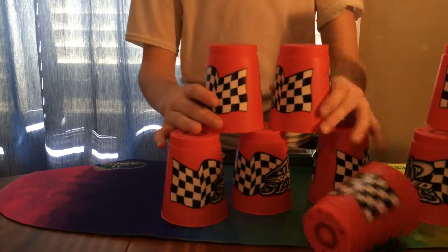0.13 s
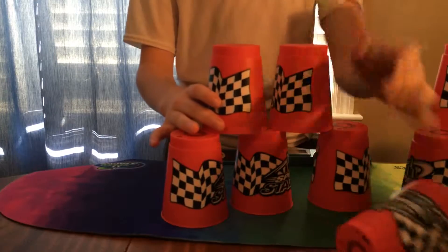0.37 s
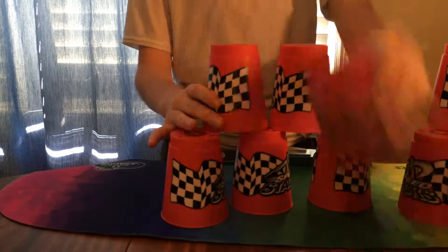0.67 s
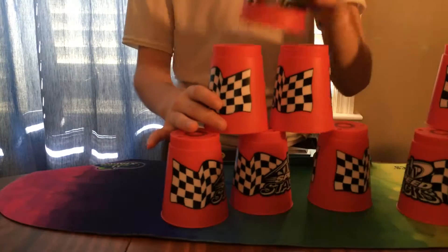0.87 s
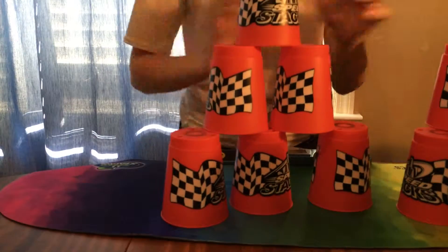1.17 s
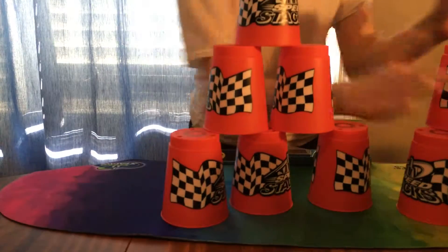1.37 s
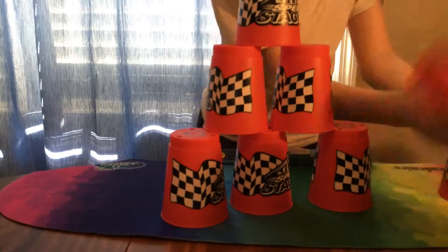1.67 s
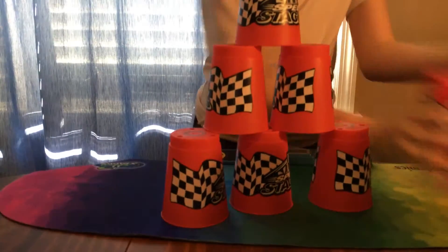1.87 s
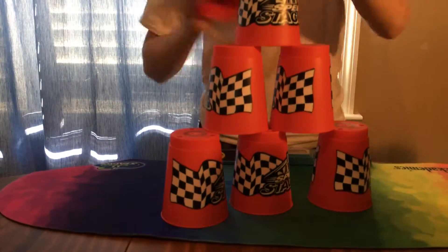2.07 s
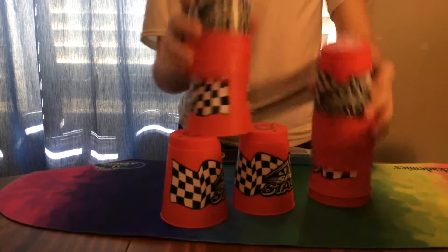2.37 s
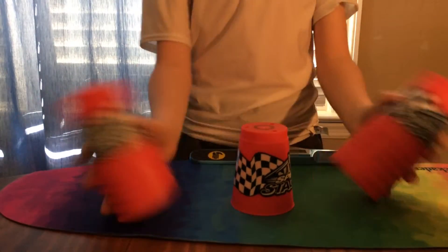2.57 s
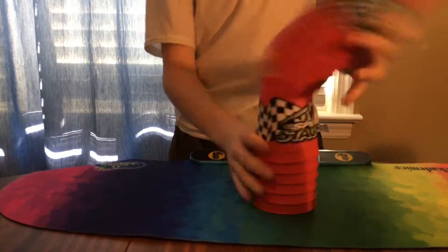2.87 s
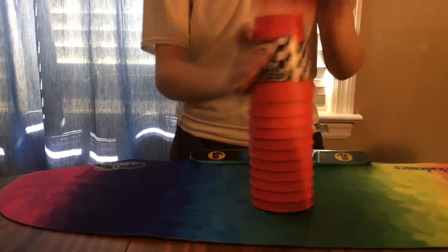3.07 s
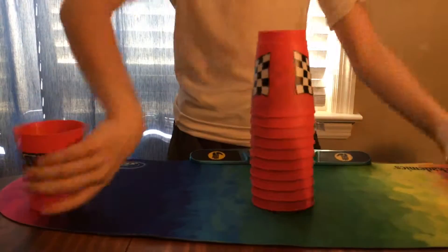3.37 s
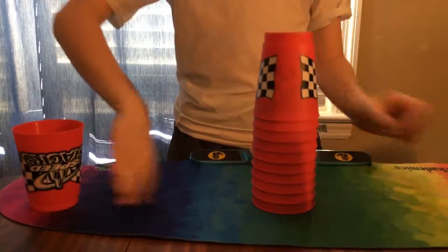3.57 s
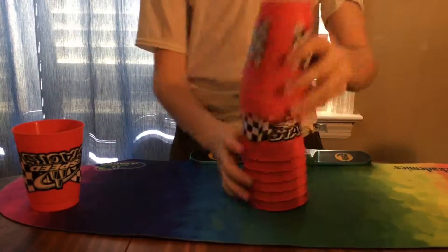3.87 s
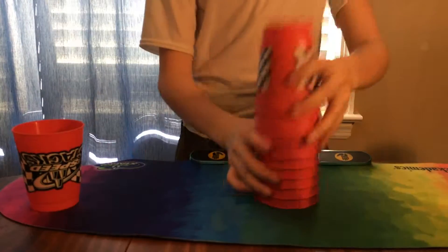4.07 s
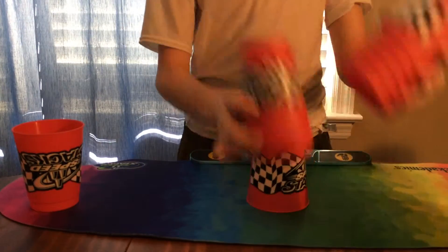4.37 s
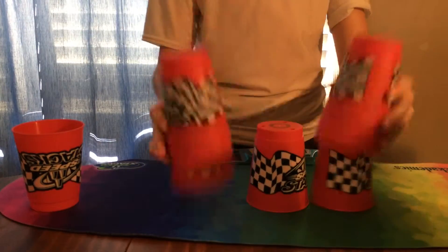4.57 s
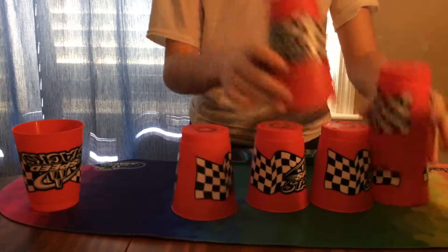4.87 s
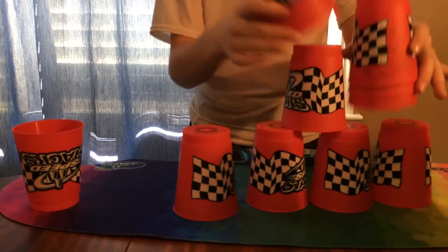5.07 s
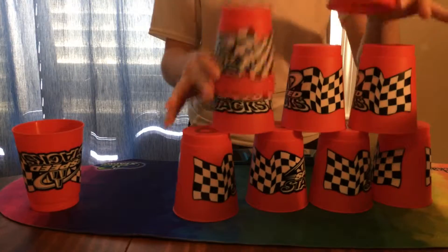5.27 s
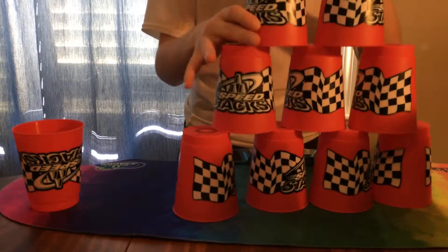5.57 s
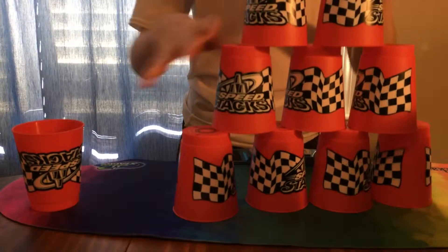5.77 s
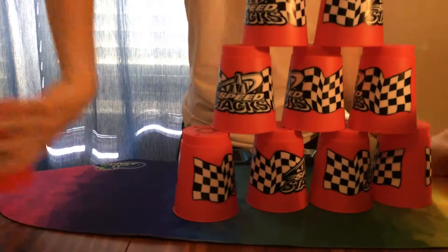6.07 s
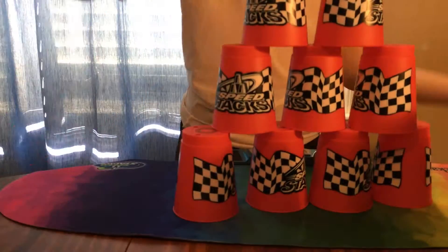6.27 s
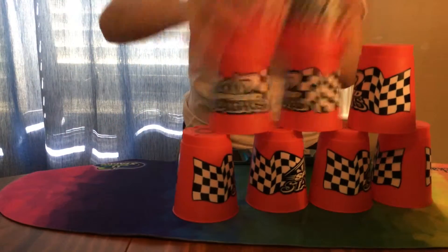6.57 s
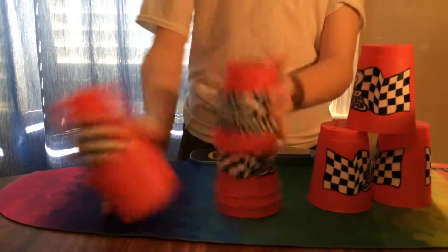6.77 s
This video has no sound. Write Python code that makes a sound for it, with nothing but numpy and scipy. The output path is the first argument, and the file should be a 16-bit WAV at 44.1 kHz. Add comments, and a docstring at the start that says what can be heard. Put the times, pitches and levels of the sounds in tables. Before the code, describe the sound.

Plastic cups clack and rasp in fast runs as they are stacked and unstacked on a mat in a small room.

```python
"""Plastic cups are stacked and unstacked fast on a thin mat over a wooden table in a small room.
First come a few clacks and a fallen cup rolls; each impact puffs the air in a cup, rings its wall, cracks
at the rim and thumps the table or the cups below. From 1.5 s to 3.1 s three towers collapse: sliding
friction rasps and makes the air columns hum. Scattered clacks and strokes follow, and at 6.6 s a last
tower slides together."""
import sys
import numpy as np
from scipy import signal
from scipy.fft import rfft, irfft, next_fast_len
from scipy.io import wavfile
from scipy.ndimage import uniform_filter1d, map_coordinates

SR = 44100
rng = np.random.default_rng(int(sys.argv[2]) if len(sys.argv) > 2 else 0)


def inscribe(sig):
    """Save sig as 16-bit PCM at rate SR to the path in sys.argv[1].

    A 1-D sig is mono; a 2-D sig holds one channel per row.
    Samples are clipped to [-1, 1] before scaling.
    """
    pcm = np.round(np.clip(np.atleast_2d(sig).T, -1, 1) * 32767)
    wavfile.write(sys.argv[1], SR, pcm.astype(np.int16))


N = 305169


def amp(db):
    """Amplitude ratio of a level in dB."""
    return 10 ** (np.asarray(db) / 20)


def unit(x):
    """Normalisation to rms 1."""
    return x / np.sqrt(np.mean(x ** 2) + 1e-20)


def along(points, hz):
    """Interpolation on a logarithmic frequency axis."""
    f, v = np.transpose(points)
    return np.interp(np.log(hz + 1), np.log(f + 1), v)


def filtered(x, response):
    """Linear filtering: the spectrum times a frequency response."""
    m = next_fast_len(N + SR // 2)
    return irfft(rfft(x, m) * response(np.fft.rfftfreq(m, 1 / SR)), m)[..., :N]


def coloured(x, spectrum):
    """Spectral shaping by relative levels, at rms 1."""
    return unit(filtered(x, lambda hz: amp(along(spectrum, hz))))


def ring(t, hz, db, t60, rise):
    """Modal superposition: damped sines that build up over the contact time."""
    hz, db, t60 = (np.reshape(v, (-1, 1)) for v in (hz, db, t60))
    return np.sum(amp(db - 60 * t / t60) * np.sin(2 * np.pi * hz * t), 0) * (1 - np.exp(-t / rise))


def struck(modes, t, chance, rise, spread_db, detune):
    """Impact excitation of modes, with scatter in pitch and strength."""
    hz, db, t60 = np.transpose(modes)
    n = len(hz)
    return ring(t, hz * (1 + detune * chance[:n]), db + spread_db * chance[-n:], t60, rise)


def grit(per_s, spread_db):
    """Amplitude modulation breaks noise into grains of uneven size."""
    sizes = amp(spread_db * rng.standard_normal(int(N * per_s / SR) + 2))
    return rng.standard_normal(N) * np.interp(np.arange(N) * per_s / SR, np.arange(len(sizes)), sizes)


def patchy(x, depth_db):
    """Spectral modulation: the colour shifts from moment to moment."""
    z = signal.stft(x, nperseg=256)[2]
    field = uniform_filter1d(rng.standard_normal(z.shape), size=5, axis=0)
    field = uniform_filter1d(field, size=6, axis=1)
    return signal.istft(z * amp(depth_db * unit(field)), nperseg=256)[1][:N]


def wander(step):
    """Smooth random modulation, a new value every step samples."""
    return map_coordinates(rng.standard_normal(N // step + 2), [np.arange(N) / step])


# Noise floor spectrum: f/Hz, level/dB
HUSH = [(15, -35.5), (25, 2.5), (87, 3), (212, -13), (249, -6), (335, -4), (575, -15.5), (840, -8),
        (1130, -18.5), (1290, -10), (1790, -23.5), (8830, -37.5), (16000, -38.5)]
def hush():
    """Stationary noise of room and microphone."""
    return amp(-63.5) * coloured(rng.standard_normal(N), HUSH)


# Background envelope: t/s, hiss level/dB, rumble level/dB
BACKGROUND = [(0, -65, -48), (0.599, -87, -63.5), (0.799, -77, -65.5), (1.5, -95, -67.5), (1.7, -60, -39.5),
              (2.05, -69, -66), (2.6, -74, -50), (3.3, -65.5, -68.5), (3.549, -63, -46.5),
              (3.715, -62, -64.5), (3.86, -70, -58.5), (4.2, -70, -59), (4.901, -63.5, -59),
              (5.8, -73.5, -64), (6.2, -66.5, -62), (6.5, -90, -75), (6.6, -69.5, -57), (6.9, -59, -43)]
# Spectrum of the hiss and of a bright rim crack: f/Hz, level/dB
BRIGHT = [(1500, -3), (2500, 3.5), (4000, 1.5), (7000, 2.5), (10000, -1.5), (15000, -13)]
# Rumble spectrum: f/Hz, level/dB
RUMBLE = [(25, -10), (60, 10), (150, 3.5), (300, 3), (450, -33)]
def background():
    """Modulated noise: the hiss and low rumble rise and fall, dropping lowest in the long pauses."""
    s, hiss_db, rumble_db = np.transpose(BACKGROUND)
    time = np.arange(N) / SR
    hiss = coloured(patchy(grit(30, spread_db=2), depth_db=3), BRIGHT)
    rumble = coloured(grit(25, spread_db=3), RUMBLE)
    return amp(np.interp(time, s, hiss_db)) * hiss + amp(np.interp(time, s, rumble_db)) * rumble


# Reverberation time: f/Hz, T60/s
ROOM = [(100, 0.46), (400, 0.17), (1000, 0.22), (4000, 0.21), (12000, 0.072)]
def room(x):
    """Reverberation: each band decays at its own rate, with a fresh tail for each stretch of sound."""
    out, step, delay = np.zeros(N + SR), SR // 8, SR // 200
    for k in range(0, N, step):
        hz, t, z = signal.stft(rng.standard_normal(SR // 2), SR, nperseg=256)
        tail = signal.istft(z * amp(-60 * t / along(ROOM, hz)[:, None]), SR, nperseg=256)[1]
        wet = signal.fftconvolve(x[k:k + step], tail / np.linalg.norm(tail))
        out[k + delay:][:len(wet)] += wet
    return out[:N]


# Modes of the table: f/Hz, level/dB, T60/s
TABLE_MODES = [(84.7, -14, 0.17), (121.3, -15.5, 0.17), (158.1, -7, 0.11), (212.5, -7, 0.079),
               (279, -2, 0.06), (329.5, -3, 0.06), (417, -18.5, 0.13)]
# Soft knocks of a hand or cushioned cup: t/s, relative level/dB
BUMPS = [(3.581, -44), (3.696, -34.5), (3.728, -41), (3.895, -40), (4.07, -31), (6.147, -42),
         (6.213, -49.5)]
def bumps():
    """A long contact acts as a low-pass: only low table modes ring, damped by the hand."""
    out, t = np.zeros(N + SR), np.arange(SR // 4) / SR
    cutoff_hz, t60_share = 141, 0.63
    low = [(hz, db - 20 * np.log10(1 + (hz / cutoff_hz) ** 6), t60_share * t60)
           for hz, db, t60 in TABLE_MODES]
    for (s, db), chance in zip(BUMPS, rng.standard_normal((len(BUMPS), 16))):
        knock = struck(low, t, chance, rise=0.0034, spread_db=3, detune=0.023)
        out[round(s * SR):][:len(t)] += amp(db + 15) * knock
    return out[:N]


# Rubs on a cup wall: t/s, duration/s, f/Hz, level/dB
SQUEAKS = [(1.69, 0.011, 1750, -26.5), (1.729, 0.03, 1870, -36.5), (4.002, 0.028, 700, -39.5),
           (4.064, 0.031, 750, -40), (4.094, 0.018, 5840, -42.5), (4.138, 0.013, 3250, -41),
           (4.287, 0.025, 4300, -43.5), (1.785, 0.02, 3300, -25), (6.584, 0.021, 2220, -24.5),
           (6.701, 0.012, 2130, -27), (6.757, 0.02, 3290, -26.5)]
def squeaks():
    """Resonance: one narrow wall mode filters friction noise."""
    out = np.zeros(N)
    for start, length, hz, db in SQUEAKS:
        n = round(length * SR)
        b, a = signal.iirpeak(hz, Q=hz / 130, fs=SR)
        tone = unit(signal.lfilter(b, a, rng.standard_normal(n)))
        out[round(start * SR):][:n] += amp(db) * tone * np.hanning(n) ** 0.29
    return out


# Spectra of sliding plastic and of its finest grain: f/Hz, level/dB
RASP = [(650, -31), (1100, -19.5), (1450, -13.5), (2350, -13), (3050, -12), (3400, -6.5), (4070, -9),
        (4920, -12.5), (5430, -6.5), (9500, -12.5), (12400, -61.5)]
SIZZLE = [(7500, -13.5), (9000, -3), (11500, 0.5), (14000, -3), (16000, -2)]
# Rims catching: t/s, initial level/dB
TICKS = [(1.6361, -19.5), (2.3261, -24), (2.394, -33), (2.4543, -33), (2.5735, -23), (2.6247, -28),
         (2.904, -26.5), (4.14, -30.5), (4.2637, -41), (4.494, -34.5), (4.7417, -23), (6.575, -23),
         (6.7536, -23), (6.796, -27), (6.8543, -27)]
def ticks():
    """Transients: one rim catches another in a fast-decaying burst of friction noise."""
    out, t, t60 = np.zeros(N + SR), np.arange(SR // 50) / SR, 0.0075
    noise = rng.standard_normal(N)
    fine = unit(coloured(noise, SIZZLE) + coloured(noise, RASP))
    for s, db in TICKS:
        k = round(s * SR)
        out[k:k + len(t)] += amp(db - 60 * t / t60) * fine[k:k + len(t)]
    return out[:N]


# Air columns of sliding cups: f/Hz, bandwidth/Hz, level/dB
HOLLOW = [(636.7, 129, 2.5), (657, 255, 2), (802, 188, -2), (882, 87, -7.5)]
def hollow(f):
    """Frequency response of parallel air resonances, alternating in sign."""
    return sum((-1) ** k * amp(db) * 1j * f * width / (hz * hz - f * f + 1j * f * width)
               for k, (hz, width, db) in enumerate(HOLLOW))


# A rolling cup, and one curve per collapsing tower: t/s, rasp/dB, sizzle re rasp/dB, hum/dB
ROLL = [(.282, -64, -13, -63), (.34, -79, -7, -57), (.42, -78, -11, -52.5), (.53, -71, -4, -53),
        (.598, -70, -6.5, -60), (.69, -90, -12.5, -48.5), (.754, -89, -11, -69)]
COLLAPSES = [
    [(1.536, -53.5, -24, -43), (1.558, -27.5, -18.5, -27), (1.602, -32.5, -14, -40.5),
     (1.61, -38, -12, -31.5), (1.655, -35.5, -4, -41), (1.705, -51, 0, -44), (1.714, -45, -7.5, -47.5),
     (1.77, -50, -5.5, -50.5), (1.808, -34.5, -20, -25.5), (1.835, -59.5, -14.5, -53.5),
     (1.868, -44.5, -5, -29.5), (1.9, -44.5, -12, -46), (1.965, -55.5, -13.5, -56.5)],
    [(2.222, -43, 9, -47.5), (2.245, -36, -3.5, -29.5), (2.277, -30.5, -0.5, -15.5),
     (2.287, -40.5, -10.5, -20.5), (2.32, -39, -11, -35), (2.33, -28, -6, -23), (2.372, -50, -14, -35),
     (2.43, -44, -1.5, -34), (2.445, -51, -3.5, -39), (2.54, -44, -9, -39.5), (2.55, -39.5, -5.5, -21.5),
     (2.615, -43, -0.5, -50), (2.67, -44.5, -8, -40), (2.682, -51.5, -3, -30.5), (2.728, -49, -12, -32)],
    [(2.921, -43.5, 4, -39), (2.949, -26.5, -2, -17.5), (2.96, -49, -15, -20), (3.005, -48.5, -5, -30.5),
     (3.07, -48.5, 8.5, -63), (3.08, -48.5, 1, -31), (3.121, -78, -12.5, -49)],
    [(6.574, -51, -5, -33), (6.595, -34, -2, -49), (6.608, -45, 2, -11.5), (6.66, -34.5, -2, -62),
     (6.684, -42, -9, -21.5), (6.7, -34, -1, -32), (6.735, -31, -5, -42), (6.755, -37, -10, -51),
     (6.805, -41, -2, -51), (6.85, -44.5, -5, -57), (6.862, -39, -3, -30), (6.92, -43.5, -14, -38)],
]
# Strokes of cups and fingers: peak t/s, swell/s, fade/s, rasp/dB, sizzle re rasp/dB, hum/dB
STROKES = [(0.066, 0.013, 0.021, -49.5, -28, -61), (.603, 0.0036, 0.075, -43, -20.5, -46.5),
           (.645, 0.053, 0.023, -45, -1.5, -51), (0.891, .01, 0.021, -68.5, -2, -88),
           (1.024, 0.087, 0.019, -90, -4.5, -52), (1.115, 0.005, 0.063, -64, -15, -45.5),
           (2.136, 0.017, 0.24, -63, -12, -60.5), (2.79, 0.0057, 0.046, -56.5, -12.5, -57),
           (3.16, 0.058, 0.037, -44.5, -1.5, -58), (3.201, 0.0052, 0.047, -37, -2.5, -43),
           (3.9, 0.062, 0.046, -55.5, -4, -58), (3.995, 0.076, 0.02, -44, -2.5, -45.5),
           (4.119, 0.059, 0.015, -43, -8, -53), (4.15, 0.015, 0.0093, -45, 3.5, -65),
           (4.165, 0.013, 0.064, -35, -1.5, -48), (4.299, 0.061, 0.06, -38, -8.5, -64),
           (4.34, 0.006, 0.27, -63, -4, -55), (4.495, 0.0029, 0.016, -42.5, -2, -65),
           (4.615, 0.073, 0.082, -42, -5, -49), (4.731, 0.037, 0.079, -46, -6, -48),
           (4.799, 0.0039, 0.0059, -40.5, 0, -60), (4.952, 0.0046, 0.081, -39.5, -6, -29),
           (5.248, 0.02, 0.43, -55.5, -24, -43.5), (5.484, 0.0039, 0.017, -44, -15, -58),
           (6.107, 0.0049, 0.053, -50.5, -3.5, -62), (6.196, 0.0095, 0.054, -61, -14, -60),
           (6.265, 0.019, 0.045, -56.5, -18.5, -66), (6.38, 0.031, 0.027, -62, -18, -87.5)]
def slides():
    """Stick-slip friction rasps, sizzles and drives the air columns into a hum."""
    time, gains = np.arange(N) / SR, np.zeros((3, N))
    swell_db, fade_db, hum_share = 19, 20.5, 0.8
    strokes = [[(s + lag, rasp_db - loss_db, sizzle_db, hum_db - hum_share * loss_db)
                for lag, loss_db in ((-swell, swell_db), (0, 0), (fade, fade_db))]
               for s, swell, fade, rasp_db, sizzle_db, hum_db in STROKES]
    for curve in [ROLL, *COLLAPSES, *strokes]:
        s, rasp_db, sizzle_db, hum_db = np.transpose(curve)
        span = slice(round(s[0] * SR), round(s[-1] * SR))
        levels = rasp_db, rasp_db + sizzle_db, hum_db
        gains[:, span] += amp([np.interp(time[span], s, db) for db in levels])
    gains = uniform_filter1d(gains, size=260, axis=1)
    ridges = 4 * (rng.random(N) < 200 / SR) * rng.standard_normal(N)  # about 200 rim catches a second
    grains = unit(grit(470, spread_db=3.5)) + signal.lfilter([1], [1, -.6], ridges)
    grains = patchy(grains, depth_db=4.5)  # the rubbing spot moves
    hum = unit(filtered(grit(120, spread_db=4), hollow))
    return np.sum(gains * [coloured(grains, RASP), coloured(grains, SIZZLE), hum], 0)


# Modes of the cups below: f/Hz, level/dB, T60/s
PYRAMID_MODES = [(80, -15, .15), (145, -7.5, 0.11), (327, -3, 0.083), (392.3, 1, 0.069)]
# Spans in which cups land on cups: start t/s, end t/s
ON_CUPS = [(.2, .22), (1, 1.05), (5, 5.8)]
def thump(s, t, chance):
    """Free vibration of the struck support: lower cups or table."""
    modes = PYRAMID_MODES if any(start < s < end for start, end in ON_CUPS) else TABLE_MODES
    return struck(modes, t, chance, rise=0.0021, spread_db=2.8, detune=0.051)


# Cup wall modes: f/Hz, level/dB, T60/s
WALL_MODES = [(1091, -8, 0.043), (1271, 1.5, 0.02), (1563, -0.5, 0.016), (2016, -0.5, 0.012)]
def wall(t, chance, rocking, rattle):
    """Damped vibration of the wall, with the rattle of loose cups."""
    modes = struck(WALL_MODES, t, chance, rise=0.0009, spread_db=3.5, detune=0.055)
    return modes * np.sqrt(rocking) + rattle * amp(-9.5 - 60 * t / 0.096) * (1 - np.exp(-t / 0.00037))


# Rim modes: f/Hz, level/dB, T60/s
RIM_MODES = [(3240, -13.5, 0.014), (4005, -11, 0.014), (5380, -15.5, 0.012), (5760, -11.5, 0.0045),
             (6580, -13, 0.014)]
def rim(t, chance, snap, chatter):
    """A brief impact is broadband: a noise burst over modes blurred by chatter."""
    burst = snap * (amp(1.0 - 60 * t / 0.0052) + amp(-21.5 - 60 * t / 0.09)) * (1 - np.exp(-t / 0.0012))
    return burst + struck(RIM_MODES, t, chance, rise=0.00011, spread_db=3.0, detune=0.034) * chatter


# Air columns of cups standing nearby: f/Hz, level/dB, T60/s
NEIGHBOURS = [(421.8, -10.5, 0.064), (617, -4, 0.044), (647.3, -8.5, 0.056), (750.4, -18, 0.077),
              (834.5, -14.5, 0.15), (876.4, -12.5, 0.085), (931, -7.5, 0.06)]
def air_column(t, hz, chance, rocking):
    """Squeezed air puffs and rings on; cups close in pitch answer most, by sympathetic resonance."""
    near_hz, near_db, t60 = np.transpose(NEIGHBOURS)
    n, swell = len(near_hz), t / 0.00085
    puff = 1.45 * swell ** 2 * np.exp(-swell) * np.sin(2 * np.pi * hz * t)
    level_db = near_db - 10 * np.log10(1 + ((near_hz - hz) / 300) ** 2) + 4.5 * chance[-n:]
    answer = ring(t, near_hz * (1 + 0.012 * chance[:n]), level_db, t60, rise=0.0032)
    own = ring(t, hz, db=-0.41, t60=0.087, rise=0.0014)
    return puff + amp(-8.5) * (2.37 * np.sign(chance[0]) * answer + own) * rocking


# Spectra of a cushioned crack and of loose cups shaking: f/Hz, level/dB
DULL = [(1500, -12), (2500, -2), (4000, 5), (6500, -5), (10000, -23.5), (15000, -31.5)]
RATTLE = [(200, -21), (350, 8), (700, -8.5), (1200, 1.5), (2000, 0), (2700, -19), (4000, -43)]
# Impacts: t/s, air level/dB, air f/Hz, thump level/dB, wall level/dB, rim level/dB
CONTACTS = [(0.0395, -15.5, 295, -34, -38.5, -37.5), (0.0967, -22, 283, -32.5, -58, -47),
            (0.1498, -31.5, 614, -30, -46, -55), (0.2123, -3, 826, -20.5, -17, -11.5),
            (0.3158, -27.5, 877, -32, -33.5, -43.5), (0.4949, -35.5, 644, -39.5, -69, -66),
            (0.5998, -28, 227, -33.5, -43.5, -41), (0.655, -35, 220, -35, -69, -60),
            (.746, -43, 692, -57, -75.5, -71), (.989, -42, 750, -49, -66.5, -71.5),
            (1.028, -6.5, 825, -25, -14.5, -14.5), (1.0427, -9.5, 860, -24, -44.5, -24.5),
            (1.135, -29, 820, -37, -71, -53), (1.5626, -15.5, 806, -23.5, -34, -34.5),
            (1.581, -18, 927, -26.5, -38.5, -35.5), (1.5892, -11.5, 880, -27.5, -42, -24),
            (1.6119, -15, 497, -39.5, -25.5, -18), (1.6405, -15.5, 876, -20, -29.5, -20.5),
            (1.6594, -38.5, 467, -30, -28.5, -19), (1.6766, -21, 895, -33, -18, -15.5),
            (1.7116, -29.5, 925, -37.5, -15, -33.5), (1.722, -22, 844, -39.5, -21, -13),
            (1.7873, -13, 920, -12, -8.5, -7.5), (1.855, -5.5, 880, -18.5, -14, -14),
            (1.873, -35.5, 808, -26.5, -37, -13.5), (1.9088, -26, 530, -30.5, -26, -23.5),
            (1.9245, -22, 1140, -15, -10.5, -13), (2.223, -19.5, 740, -27, -47, -17),
            (2.2439, -9.5, 850, -25, -32, -25), (2.2728, -17, 860, -12, -37, -28.5),
            (2.2793, -7, 718, -21.5, -12.5, -12), (2.324, -17, 880, -20, -29, -18),
            (2.3398, -5, 803, -20.5, -21, -17), (2.361, -26.5, 845, -40.5, -22, -20),
            (2.395, -29.5, 624, -51.5, -43.5, -30), (2.407, -21.5, 888, -38.5, -43, -31),
            (2.4204, -20, 645, -36.5, -49, -28.5), (2.485, -22, 670, -14.5, -16.5, -18),
            (2.5483, -27.5, 565, -24, -23, -26), (2.5682, -15, 649, -34, -21.5, -38),
            (2.5747, -32, 646, -39, -28, -25), (2.627, -26.5, 680, -35.5, -52.5, -36.5),
            (2.642, -32, 655, -35, -37, -47), (2.6605, -23, 600, -26, -35, -21),
            (2.6755, -8, 690, -5, -13, -12), (2.7335, -30, 646, -45, -52, -57),
            (2.775, -47, 760, -50.5, -48, -51), (2.7972, -18.5, 714, -42.5, -32.5, -51),
            (2.8237, -23.5, 652, -51.5, -32.5, -30.5), (2.904, -26.5, 635, -32.5, -42, -30.5),
            (2.9185, -32.5, 824, -38.5, -41.5, -19), (2.9328, -20, 590, -36, -22, -23.5),
            (2.9461, -10, 606, -3, -8.5, -20), (2.9731, -21, 666, -31, -19.5, -17.5),
            (3.071, -19, 642, -12.5, -20.5, -21), (3.159, -52, 700, -47, -47.5, -38.5),
            (3.2018, -32.5, 452, -31, -50.5, -56.5), (3.238, -33, 744, -31.5, -47, -54),
            (3.4512, -4, 812, -15.5, -15, -20.5), (3.4604, -9, 802, -11, -33, -24),
            (3.4704, -11, 686, -25.5, -31, -40), (3.4818, -4.5, 927, -22, -20.5, -18),
            (3.886, -47.5, 804, -52, -44, -60), (3.8991, -40.5, 680, -38, -53, -53),
            (4.1649, -17.5, 540, -30, -38.5, -24.5), (4.2011, -25.5, 663, -19, -24, -31),
            (4.2141, -15.5, 330, -19.5, -24.5, -28), (4.264, -26, 464, -57, -32.5, -49.5),
            (4.296, -31.5, 884, -37, -35.5, -39.5), (4.338, -24.5, 640, -37, -38, -56),
            (4.3927, -45, 460, -39, -49, -37.5), (4.5562, -40, 807, -75, -48, -62.5),
            (4.6039, -15, 554, -18, -58, -32), (4.6117, -10.5, 616, -19.5, -26, -15),
            (4.7303, -10, 572, -20.5, -25, -40.5), (4.7417, -13.5, 660, -26, -29.5, -14),
            (4.9463, -16, 548, -21.5, -31, -26), (4.9542, -15, 645, -22.5, -19.5, -15),
            (5.0349, -7.5, 898, -19, -15.5, -15.5), (5.052, -19.5, 794, -32, -44.5, -26),
            (5.079, -31.5, 780, -35, -44, -33), (5.124, -27, 814, -30.5, -51.5, -46.5),
            (5.2459, -6.5, 809, -25.5, -18.5, -14.5), (5.2732, -10.5, 754, -24, -20.5, -23),
            (5.305, -13, 615, -49, -33, -28.5), (5.338, -2, 874, -17.5, -11, -7.5),
            (5.346, -13.5, 652, -27, -29, -18), (5.5107, -6.5, 856, -20.5, -21.5, -16.5),
            (5.53, -14.5, 680, -41, -47.5, -39.5), (5.554, -19.5, 844, -31.5, -49.5, -43.5),
            (5.617, -9, 804, -20.5, -28.5, -21), (5.622, -12.5, 916, -27.5, -39, -40),
            (5.645, -10, 886, -26, -30, -22), (5.661, -18.5, 690, -31, -41, -53.5),
            (5.7151, -7.5, 805, -20, -34.5, -19.5), (5.7211, -4.5, 863, -23.5, -26, -24.5),
            (5.7281, -18, 838, -34, -37.5, -34.5), (6.5743, -24, 970, -32.5, -29.5, -24.5),
            (6.5968, -15, 904, -39, -21, -23), (6.6038, -5, 905, -30, -18, -16),
            (6.609, -10, 756, -26, -38, -12), (6.619, -15, 856, -47, -40, -41),
            (6.64, -13.5, 906, -23, -45, -37), (6.6653, -24, 657, -50, -31, -24),
            (6.6758, -16, 845, -30, -41, -35), (6.6915, -16, 738, -52, -10, -11),
            (6.7193, -6, 826, -15.5, -24, -13.5), (6.729, -12, 885, -47, -15, -12.5),
            (6.735, -15, 900, -39, -30, -37), (6.7625, -4, 784, -13.5, -16, -26),
            (6.7676, -54, 860, -20, -16, -8), (6.8141, -26, 605, -50, -53, -44),
            (6.824, -23, 579, -41, -50, -23), (6.8559, -31, 487, -20, -43, -27),
            (6.863, -12, 585, -20, -16.5, -44), (6.8766, -4.5, 822, -11.5, -14, -11.5),
            (6.914, -18, 845, -33, -44.5, -35)]
def clacks():
    """Superposition: each impact excites air column, wall, support and rim together."""
    out, t = np.zeros(N + SR), np.arange(SR // 4) / SR
    chances = rng.standard_normal((len(CONTACTS), 4, 16))
    bright, dull = coloured(rng.standard_normal(N), BRIGHT), coloured(rng.standard_normal(N), DULL)
    rattle = coloured(grit(200, spread_db=7.0), RATTLE)
    rocking = unit(amp(4.5 * wander(300)))  # cups rock, so the ring flutters
    chatter = unit(wander(30))
    for (s, air_db, air_hz, thump_db, wall_db, rim_db), chance in zip(CONTACTS, chances):
        k = round(s * SR)
        piece = lambda x: np.resize(x[k:k + len(t)], len(t))
        edge = 1 / (1 + amp(air_db - rim_db - 6.0))  # rim on rim is bright, a flat landing dull
        snap = np.sqrt(edge) * piece(bright) + np.sqrt(1 - edge) * piece(dull)
        out[k:k + len(t)] += (amp(air_db) * air_column(t, air_hz, chance[0], piece(rocking))
                              + amp(wall_db) * wall(t, chance[1], piece(rocking), piece(rattle))
                              + amp(thump_db) * thump(s, t, chance[2])
                              + amp(rim_db) * rim(t, chance[3], snap, piece(chatter)))
    return out[:N]


def scene():
    """Direct sound, reverberation and background add in one channel."""
    cups = clacks() + slides() + squeaks() + ticks() + bumps()
    return (cups + amp(-13.5) * room(cups) + background() + hush())[None]


def record(dry):
    """Output shaping: bass roll-off, soft peak limiting and a treble cut near 16 kHz."""
    ceiling, hardness, low_hz, top_hz = .72, 6, 50, 15850
    thinned = filtered(dry, lambda hz: (1j * hz / (low_hz + 1j * hz)) ** 2)
    squeezed = thinned / (1 + np.abs(thinned / ceiling) ** hardness) ** (1 / hardness)
    return filtered(squeezed, lambda hz: np.clip((top_hz - hz) / 300 + .5, 0, 1) ** 2)


dry = scene()
out = record(dry)
inscribe(out)
```